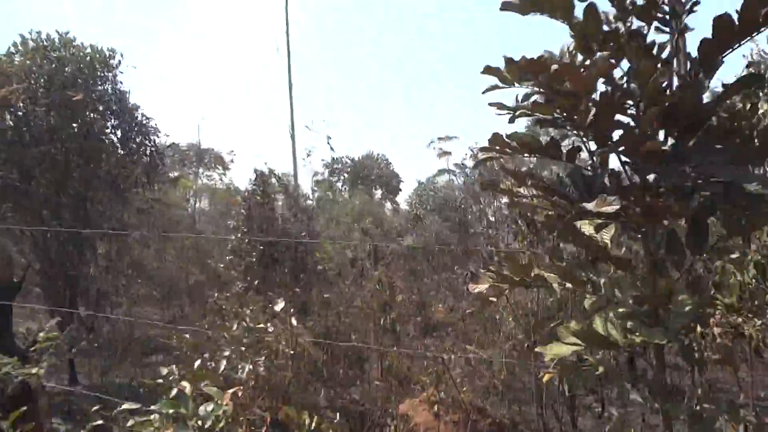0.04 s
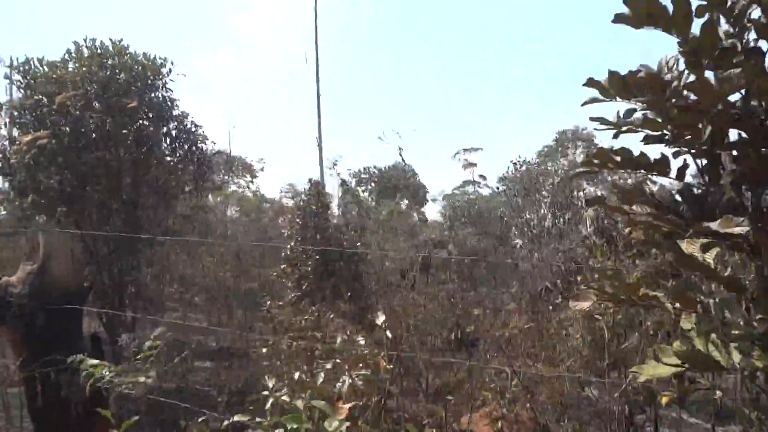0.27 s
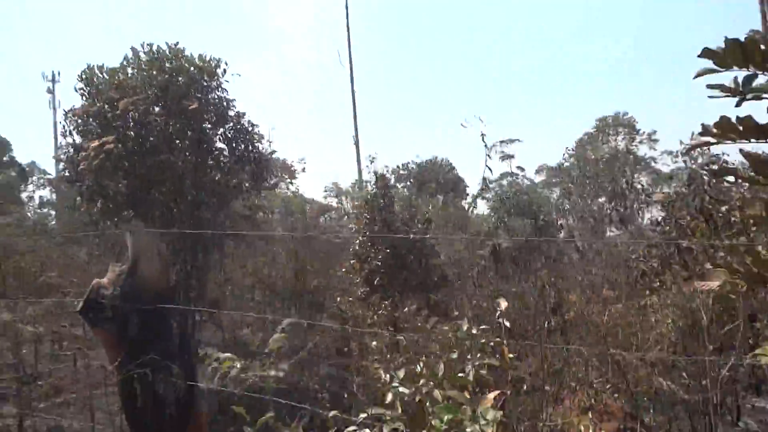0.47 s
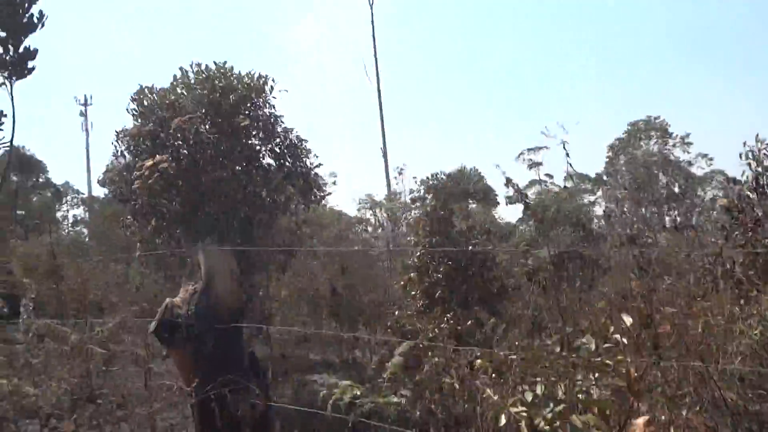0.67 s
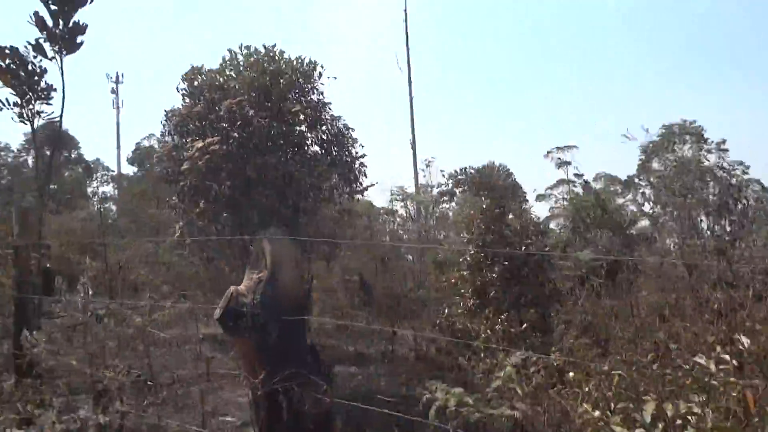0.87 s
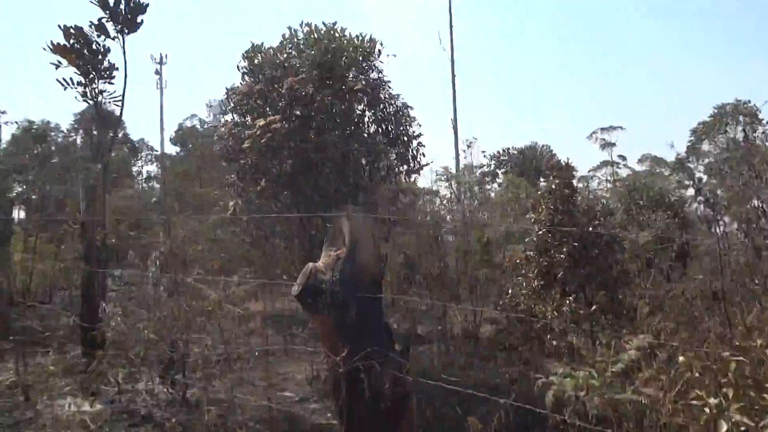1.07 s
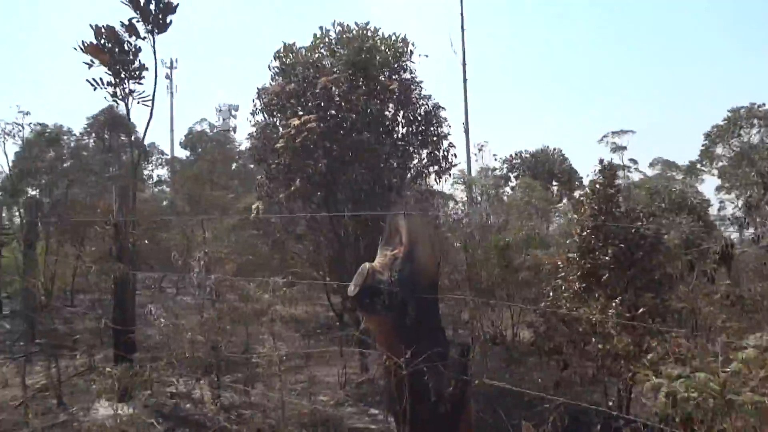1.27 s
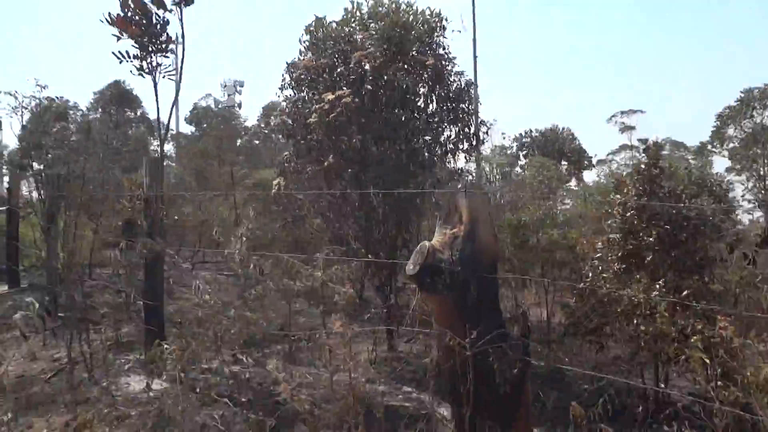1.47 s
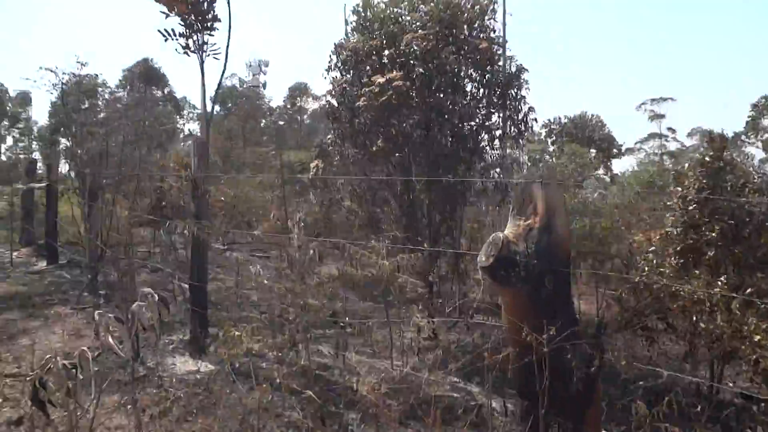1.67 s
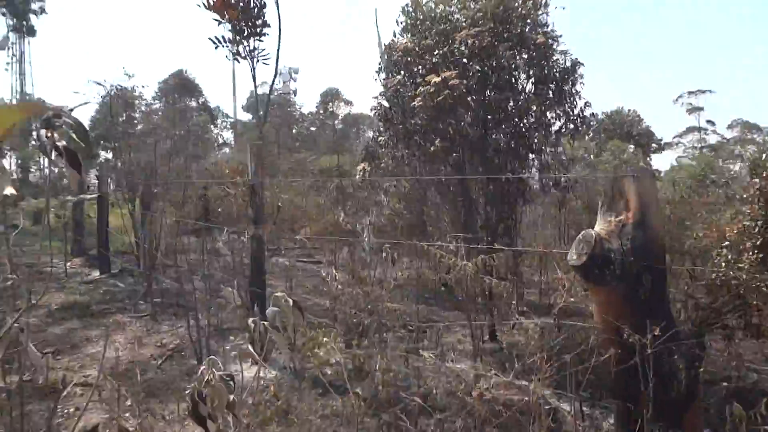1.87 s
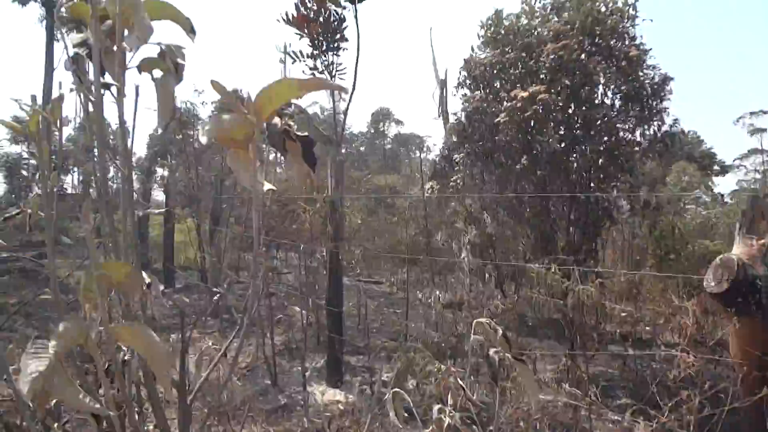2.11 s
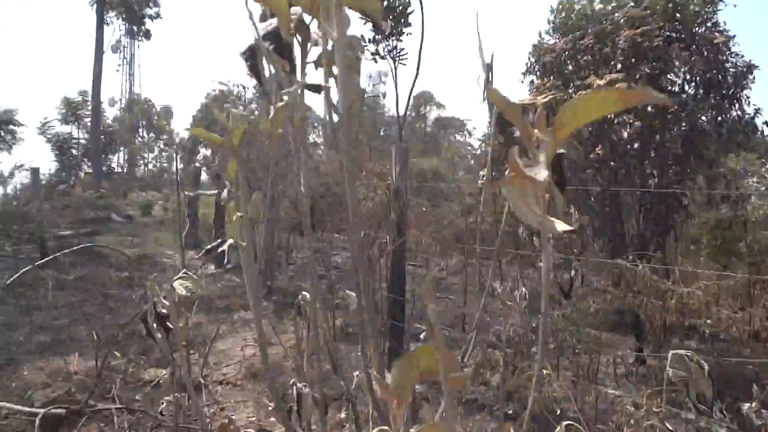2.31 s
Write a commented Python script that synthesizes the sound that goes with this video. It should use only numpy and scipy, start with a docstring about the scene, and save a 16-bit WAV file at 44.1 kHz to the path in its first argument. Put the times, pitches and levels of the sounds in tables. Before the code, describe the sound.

Wind buffets the microphone in low, rumbling puffs, builds from about 0.4 seconds to a gust near 1.3, then weakens and dies by 2.2. Under it, three slow footsteps crunch softly on dry, burnt ground at about 0.6, 1.4 and 2.1 seconds, with brittle stalks snapping and grass brushing the legs. Very faint insects, a quiet outdoor hiss and a low hum lie behind.

```python
"""Wind puffs on the microphone, swells to a gust and dies: eddies sweep across its two ports,
smaller and faster as the wind grows, over a deep rumble.
Three slow steps crunch over dry, burnt ground; stalks snap and brush against the walker.
Under it lie faint insects, a quiet outdoor hiss and a low hum."""
import sys
import numpy as np
from scipy import signal
from scipy.fft import rfft, irfft, next_fast_len
from scipy.io import wavfile
from scipy.ndimage import uniform_filter1d

SR = 44100
rng = np.random.default_rng(int(sys.argv[2]) if len(sys.argv) > 2 else 0)


def inscribe(sig):
    """Save sig as 16-bit PCM at rate SR to the path in sys.argv[1].

    A 1-D sig is mono; a 2-D sig holds one channel per row.
    Samples are clipped to [-1, 1] before scaling.
    """
    pcm = np.round(np.clip(np.atleast_2d(sig).T, -1, 1) * 32767)
    wavfile.write(sys.argv[1], SR, pcm.astype(np.int16))


N = 108045
TIME_S = np.arange(N) / SR

# hiss spectrum: f/Hz, relative density/dB
HISS_SPECTRUM = [(30, 3), (120, 15), (300, -3), (500, 8.5), (900, 6.5), (1500, 4), (3000, -0.5), (5200, -4),
                 (6800, -7), (10000, -8), (11400, -10), (13000, -11), (16000, -11)]
# left-right likeness of the hiss: f/Hz, correlation/0-1
HISS_CORRELATION = [(100, 1), (1000, 0), (4000, 0.27), (12000, 0.91)]
# hum tones: f/Hz, relative level/dB
HUM_TONES = [(199, 2.5), (129.7, -11)]
# hum envelope: t/s, level/dB
HUM_ENVELOPE = [(0.1, -53.5), (2.26, -55), (2.42, -67)]
# bush cricket chirp onsets: t/s
CHIRP_ONSETS_S = [0.033, 0.145, 0.245, 0.44, 0.765, 0.93, 1.18, 1.5, 1.605, 1.705, 1.805, 1.91, 2.21, 2.315,
                  2.415]
# crunch spectrum: f/Hz, relative density/dB
CRUNCH_SPECTRUM = [(150, 8.5), (500, 6.5), (1000, 3.5), (1700, 1.5), (2600, -1), (3600, 1), (5200, -0.5),
                   (7000, -3.5), (9800, -6.5), (11800, -1), (13500, -11), (16000, -9)]
# sole on crust, heel then toe: t/s, level/dB, rise/s, fall/s, treble tilt/(dB/oct)
SOLE_PRESSES = [(0.562, -39.5, 0.023, 0.03, 0.4), (0.582, -45.5, 0.0067, 0.015, .3),
                (0.637, -42, 0.014, 0.031, -0.5), (1.364, -37.5, 0.027, 0.022, -0.56),
                (1.455, -48.5, 0.12, 0.054, 0), (2.034, -35.5, 0.021, 0.015, -2.8),
                (2.075, -49.5, 0.057, 0.027, 1.2), (2.137, -42.5, 0.041, 0.053, -2)]
# dry grass on legs: t/s, level/dB, rise/s, fall/s, treble tilt/(dB/oct)
GRASS_BRUSHES = [(0.17, -58, 0.012, 0.042, -2.5), (0.855, -51.5, 0.031, 0.027, -5.5),
                 (0.99, -60, 0.091, 0.052, 1), (1.188, -52, 0.049, 0.039, -2),
                 (1.844, -49, 0.013, 0.029, -5.5), (1.914, -42, .006, 0.048, -5.5)]
# breaking stalks: t/s, peak/dB, f/Hz, decay/s
STALK_SNAPS = [(0.6046, -29.5, 4900, .001), (0.6404, -20.5, 12800, 0.0012), (0.6419, -26.5, 1920, 0.00033),
               (0.977, -38, 1120, 0.0013), (1.001, -45.5, 4000, .001), (1.252, -36, 1350, .0015),
               (1.253, -49, 7000, 0.00084), (1.365, -28, 3370, 0.0031), (1.913, -37.5, 1500, 0.0029),
               (2.147, -27.5, 5030, 0.00092), (2.229, -41.5, 2050, 0.00083)]
# rumble envelope: t/s, relative level/dB
RUMBLE_ENVELOPE = [(0.0, -51), (0.14, -54), (0.18, -48), (0.75, -36.5), (0.77, -49.5), (1.06, -28),
                   (1.12, -52), (1.19, -36), (1.38, -40), (1.6, -33), (1.64, -54), (1.86, -40.5),
                   (1.89, -51), (2.01, -50), (2.04, -46), (2.17, -40.5), (2.21, -47), (2.45, -75)]
# wind strength: t/s, relative level/dB
WIND_ENVELOPE = [(0.0, -35), (0.04, -31), (0.08, -59), (0.15, -49), (0.2, -38), (0.24, -27.5), (0.28, -42),
                 (0.39, -35.5), (0.44, -24), (0.53, -27), (0.58, -18), (0.62, -25.5), (0.81, -19.5),
                 (0.9, -28.5), (0.96, -23.5), (1.04, -17.5), (1.14, -25), (1.19, -18.5), (1.3, -13),
                 (1.34, -21.5), (1.4, -19.0), (1.42, -30.5), (1.5, -31.5), (1.605, -30.5), (1.63, -62),
                 (1.68, -28.5), (1.79, -40.5), (1.86, -33.5), (1.89, -36), (1.98, -36.5), (2.0, -27.5),
                 (2.165, -28.5), (2.195, -69), (2.28, -60), (2.45, -61)]
# eddies arriving from the right: t/s, share/0-1
RIGHT_SHARE = [(0, 0.02), (.25, 0.36), (1.2, 0.57), (1.5, 0), (2.1, 0.02)]
# single hard eddies, ahead of the port response: t/s, peak/dB, f/Hz
HARD_EDDIES = [(0.305, -27.5, 210), (0.359, -26.5, 226), (0.428, -28, 356.4), (0.509, -16, 203),
               (0.578, -14.5, 305), (0.703, -19, 254), (0.864, -14, 318), (0.962, -12, 274),
               (1.068, -17, 225), (1.15, -11, 288), (1.401, -16, 271), (1.563, -26.5, 306),
               (1.597, -19, 148), (1.7244, -15.5, 315), (1.856, -27, 225), (2.107, -18, 310),
               (2.167, -14.5, 297)]
# port response to wind: f/Hz, gain/dB
PORT_RESPONSE = [(20, -13), (40, -17.5), (80, -8.5), (160, 0.5), (300, 2), (500, 3), (800, 1.5), (1300, 1),
                 (3000, -19)]


def amp(db):
    """dB to gain."""
    return 10 ** (np.asarray(db) / 20)


def unit_rms(x):
    """Scale to rms 1."""
    return x / np.sqrt(np.mean(x ** 2) + 1e-20)


def at_time(table, t_s):
    """Interpolate over time."""
    return np.interp(t_s, *np.transpose(table))


def at_freq(table, f_hz):
    """Interpolate over log frequency."""
    knots_hz, values = np.transpose(table)
    return np.interp(np.log(f_hz + 1), np.log(knots_hz + 1), values)


def filtered(x, gain_at):
    """Zero-phase filter with gain gain_at(f/Hz)."""
    size = next_fast_len(2 * x.shape[-1])
    f_hz = np.fft.rfftfreq(size, 1 / SR) + 1
    return irfft(rfft(x, size) * gain_at(f_hz), size)[..., :x.shape[-1]]


def drift(rate_hz):
    """Low-pass noise, rms 1."""
    return unit_rms(filtered(rng.standard_normal(N), lambda f: np.exp(-(f / rate_hz) ** 2)))


def noise_band(f_hz, width_oct):
    """Band-pass noise, rms 1."""
    noise = rng.standard_normal(N)
    return unit_rms(filtered(noise, lambda f: np.exp(-(np.log2(f / f_hz) / width_oct) ** 2)))


def add(mix, t_s, sound):
    """Mix in at t_s, cropped to fit."""
    start = round(t_s * SR)
    sound = sound[..., max(-start, 0):]
    part = mix[..., max(start, 0):][..., :sound.shape[-1]]
    part += sound[..., :part.shape[-1]]


def hiss(level_db=-59, flicker_db=1.3):
    """Outdoor hiss: stereo noise, level flickering slightly."""
    mid, side = rng.standard_normal((2, N))
    mid = filtered(mid, lambda f: amp(at_freq(HISS_SPECTRUM, f)) * np.sqrt(1 + at_freq(HISS_CORRELATION, f)))
    side = filtered(
        side, lambda f: amp(at_freq(HISS_SPECTRUM, f)) * np.sqrt(1 - at_freq(HISS_CORRELATION, f)))
    return amp(level_db + flicker_db * drift(rate_hz=42)) * unit_rms(np.array([mid + side, mid - side]))


def hum(waver_rad=0.12):
    """Two low tones, wavering in phase."""
    tones = sum(amp(db) * np.sin(2 * np.pi * f_hz * TIME_S + waver_rad * drift(rate_hz=15))
                for f_hz, db in HUM_TONES)
    return amp(at_time(HUM_ENVELOPE, TIME_S)) * np.sqrt(2) * tones


def cricket(level_db=-69.5, period_s=0.0246, width_s=0.0053):
    """A bush cricket rasps three wing strokes per chirp."""
    strokes = sum(np.exp(-((TIME_S - t_s - k * period_s) / width_s) ** 2)
                  for t_s in CHIRP_ONSETS_S for k in range(3))
    return amp(level_db) * strokes * noise_band(f_hz=11200, width_oct=0.13)


def far_insects(level_db=-78):
    """Thin, steady drone of distant insects."""
    return amp(level_db) * noise_band(f_hz=5790, width_oct=0.079)


def crunch(t_s, level_db, rise_s, fall_s, tilt_db_oct, cracks_per_s=5400, spread_db=3, clump_db=2):
    """Tiny fractures and sliding dust swell and fade with the pressure."""
    cracks = (rng.random(N) < cracks_per_s / SR) * rng.choice([-1, 1], N)
    cracks = cracks * amp(spread_db * np.minimum(rng.exponential(1, N), 4))
    dust = 0.18 * rng.standard_normal(N)
    clumps = amp(clump_db * drift(rate_hz=75))  # crust gives way in fits and starts
    grit = filtered((unit_rms(cracks) + dust) * clumps,
                    lambda f: amp(at_freq(CRUNCH_SPECTRUM, f) + tilt_db_oct * np.log2(np.maximum(f, 700))))
    envelope = np.exp(np.minimum((TIME_S - t_s) / rise_s, (t_s - TIME_S) / fall_s))
    return amp(level_db) * unit_rms(grit) * envelope


def snap(peak_db, f_hz, decay_s, width_oct=1.0):
    """A brittle stalk breaks: a short noise burst around f_hz."""
    t_s = np.arange(1024) / SR
    burst = rng.standard_normal(len(t_s)) * np.exp(-t_s / decay_s)
    burst = filtered(burst, lambda f: 1 / (1 + (2 * np.log2(f / f_hz) / width_oct) ** 2))
    return amp(peak_db) * burst / abs(burst).max()


def footsteps(scatter_db=-9.5, t60_s=0.14):
    """Treads, brushing grass and snaps, with reflections from ground and bushes."""
    direct = sum(crunch(*row) for row in SOLE_PRESSES + GRASS_BRUSHES)
    for t_s, peak_db, f_hz, decay_s in STALK_SNAPS:
        add(direct, t_s, snap(peak_db, f_hz, decay_s))
    lag_s = np.arange(SR // 4) / SR
    tails = rng.standard_normal((2, len(lag_s))) * 1000 ** (-lag_s / t60_s)
    scatter = signal.fftconvolve(direct[None], tails / np.linalg.norm(tails[0]), axes=1)[:, :N]
    return direct + amp(scatter_db) * scatter


def rumble(f_hz=112, gain_db=-1.5, side_db=-7):
    """Large, slow eddies press on both ports nearly alike."""
    mid = noise_band(f_hz, width_oct=1)
    side = amp(side_db) * noise_band(f_hz, width_oct=1)
    return amp(at_time(RUMBLE_ENVELOPE, TIME_S) + gain_db) * np.array([mid + side, mid - side])


def eddy(t_s, f_hz, transit_s):
    """One push and pull on each port, left first if transit_s > 0. Returns start/s, pulse."""
    reach = int(SR * (1 / f_hz + abs(transit_s)))
    delay_s = np.array([[-0.5], [0.5]]) * transit_s
    phase = 2 * np.pi * f_hz * (np.arange(-reach, reach) / SR - delay_s)
    return t_s - reach / SR, -phase * np.exp((1 - phase ** 2) / 2)


def eddy_stream(transit_s, eddies_per_s=800, ref_hz=254.4, ref_db=-22, oct_per_db=0.045,
                lull_db=-37, spread_oct=0.28, spread_db=4):
    """Random eddies, quicker in stronger wind; levelled to a running rms near 1."""
    count = int(N / SR * eddies_per_s)
    stream = np.zeros((2, N))
    draws = zip(rng.random((count, 3)), rng.standard_normal((count, 3)))
    for (when, side, polarity), (pitch, push, slant) in draws:
        t_s = when * N / SR
        wind_db = max(at_time(WIND_ENVELOPE, t_s), lull_db)
        shift_oct = oct_per_db * (wind_db - ref_db) + spread_oct * np.clip(pitch, -3, 1.4)
        direction = np.sign(side - at_time(RIGHT_SHARE, t_s))
        start_s, pulse = eddy(t_s, ref_hz * 2 ** shift_oct, transit_s * (1 + 0.61 * slant) * direction)
        add(stream, start_s, np.sign(polarity - 0.5) * amp(spread_db * push) * pulse)
    power = uniform_filter1d(uniform_filter1d((stream ** 2).mean(0), size=900), size=600)
    return stream / np.sqrt(abs(power) + 1e-4)


def wind(transit_s=0.00072, gain_db=-2.5, steady_db=-17, puff_range_db=14, flutter_db=5):
    """Eddies and hard buffets hit the ports; light wind comes in puffs, the full gust is steady."""
    pressure = eddy_stream(transit_s)
    wind_db = at_time(WIND_ENVELOPE, TIME_S)
    puffiness = np.clip((steady_db - wind_db) / puff_range_db, 0, 1)
    puffs_db = flutter_db * puffiness * np.minimum(drift(rate_hz=28), 0.5)
    pressure *= amp(wind_db + puffs_db + gain_db)
    for t_s, peak_db, f_hz in HARD_EDDIES:
        start_s, pulse = eddy(t_s, f_hz, transit_s)
        add(pressure, start_s, amp(peak_db) * pulse)
    return filtered(pressure, lambda f: amp(at_freq(PORT_RESPONSE, f)))


def scene():
    """Stereo sum of all sources."""
    return wind() + rumble() + footsteps() + cricket() + far_insects() + hiss() + hum()


def record(dry, cutoff_hz=15850):
    """Low-pass band limit."""
    taps = signal.firwin(511, cutoff_hz, window=("kaiser", 9), fs=SR)
    return signal.oaconvolve(dry, taps[None], "same")


dry = scene()
out = record(dry)
inscribe(out)
```